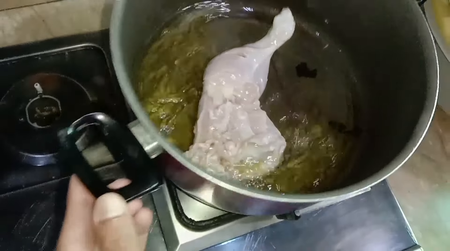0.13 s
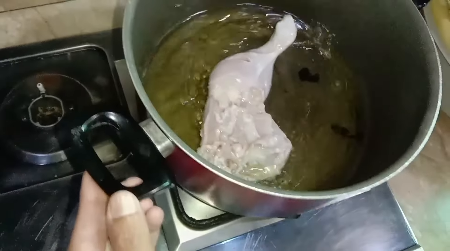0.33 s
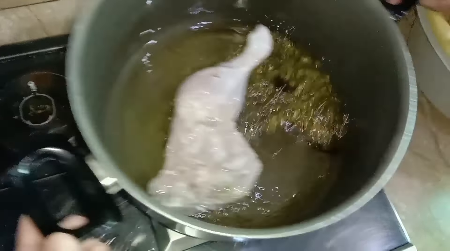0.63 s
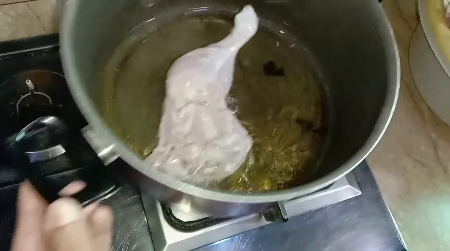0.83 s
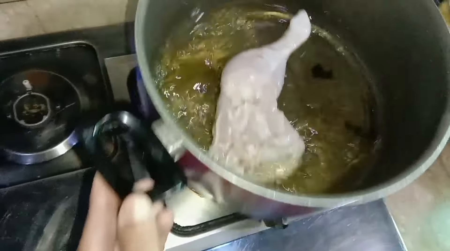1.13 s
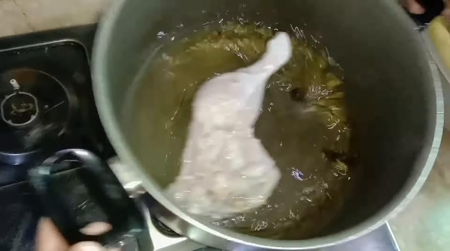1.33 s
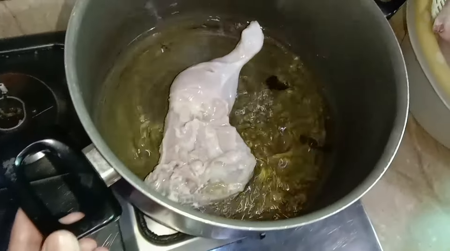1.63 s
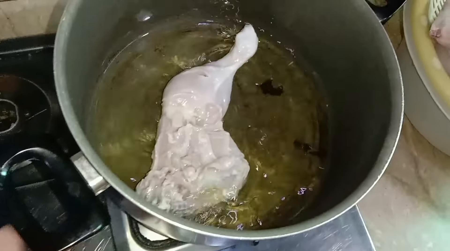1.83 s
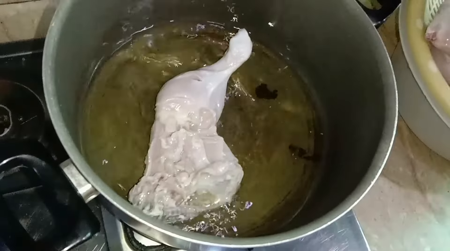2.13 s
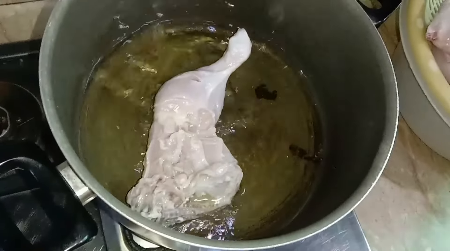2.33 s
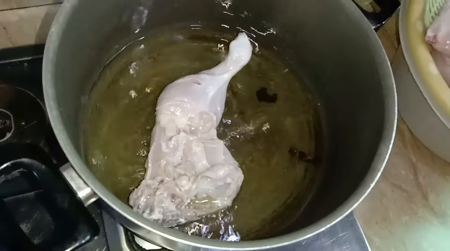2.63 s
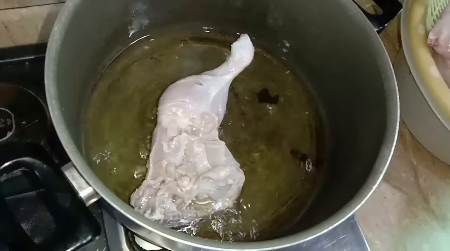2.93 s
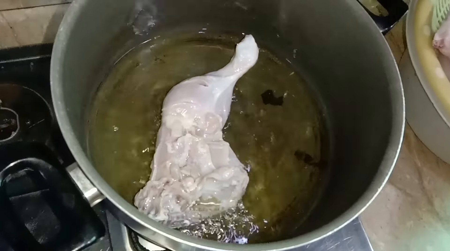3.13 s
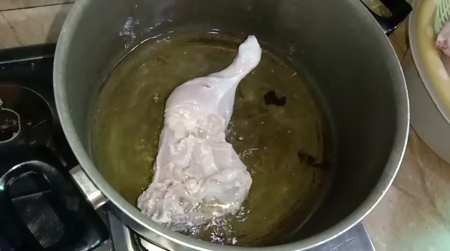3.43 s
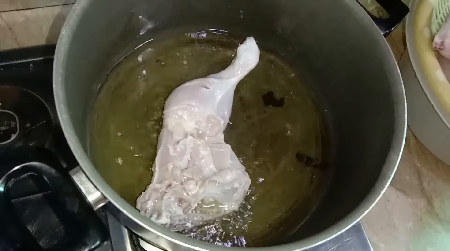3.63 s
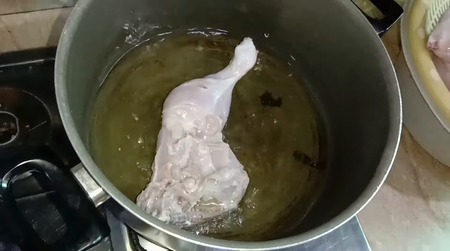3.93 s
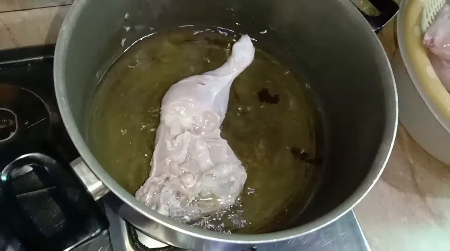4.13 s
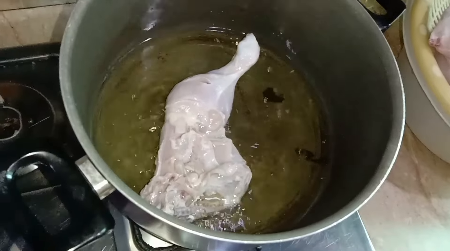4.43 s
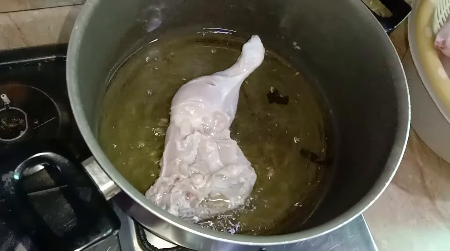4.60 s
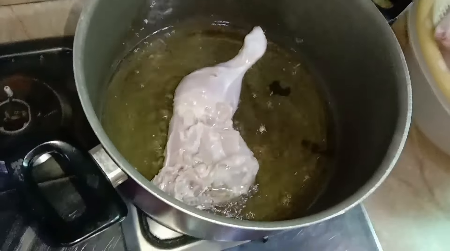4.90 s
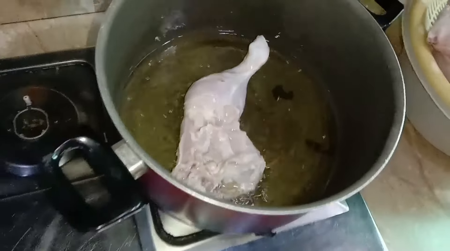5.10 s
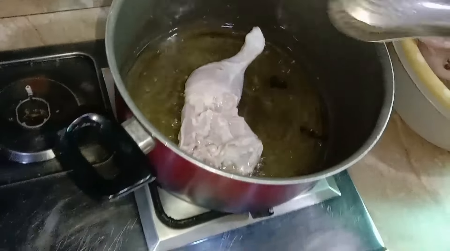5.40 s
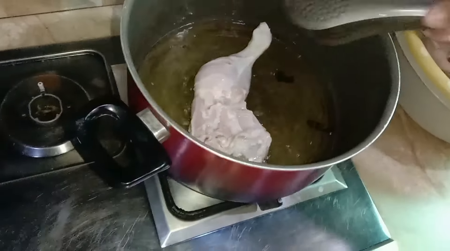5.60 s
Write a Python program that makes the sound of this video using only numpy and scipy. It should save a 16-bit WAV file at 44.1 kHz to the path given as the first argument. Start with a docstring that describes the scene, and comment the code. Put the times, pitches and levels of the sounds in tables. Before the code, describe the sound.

Oil sizzles in a deep pot as it is knocked and slid on its support, then bubbling strengthens with pops, ending in bright metal clinks.

```python
"""A chicken leg fries in a deep metal pot on a kitchen hob, heard from just above the rim.
Trains of decaying sine bubbles fizz, then boil harder; resonators and echoes stand for the pot.
Single bubbles pop, glug with a climbing pitch, and drops spit as bright bursts of noise.
The pot knocks and slides on its support as damped modes; near the end metal tongs clink."""
import sys
import numpy as np
from scipy import signal
from scipy.fft import rfft, irfft
from scipy.io import wavfile
from scipy.ndimage import uniform_filter1d

SR = 44100
rng = np.random.default_rng(int(sys.argv[2]) if len(sys.argv) > 2 else 0)


def store_wav(level_fs):
    """Save 16-bit WAV to argv[1]."""
    pcm = np.round(np.clip(np.atleast_2d(level_fs), -1, 1) * 32767)
    wavfile.write(sys.argv[1], SR, pcm.T.astype(np.int16))


N = 253969
TIME = np.arange(N) / SR
TOP_HZ = 15650  # upper limit of the microphone

# Ringing of pot and support. Each row: frequency in Hz, relative level in dB, 60 dB decay time in s.
POT_MODES = [(125, -16.5, 0.34), (192.7, -11.5, 1), (259.4, 0.5, 0.23), (435, 0, 0.12), (500.6, -9, 0.58),
             (515, -7, 0.13), (628, 1, 0.19), (770, -11, 1), (1011, 6.5, 0.13), (1066, -1, 0.2),
             (1420, -27, .2)]
# Spectrum of the fine fizz, also of hard contacts. Each row: frequency in Hz, gain in dB.
FIZZ_COLOUR = [(200, -50), (600, -18), (1400, -7.5), (2600, -2.5), (4000, -0.5), (5800, -0.5), (7300, -3.5),
               (8200, -14.5), (9200, -31), (11500, -23), (15000, -14)]
# Spectrum of a sharp snap. Each row: frequency in Hz, gain in dB.
SNAP_COLOUR = [(300, -41), (1500, -14), (4000, 9), (7500, 4.5), (9200, -9.5), (11400, -9), (12600, 2.5),
               (15000, 5)]
# The loudest bubbles. Each row: start in seconds, pitch in Hz, level in dB before the gain of pops().
POPS = [(.682, 5370, -21), (.805, 3370, -21), (1.085, 6550, -19), (1.232, 5550, -15.5), (1.454, 2300, -12),
        (1.532, 5470, -20), (1.944, 5170, -18.5), (2.016, 2570, -14.5), (2.16, 5500, -19.5),
        (2.206, 7100, -21), (2.26, 6350, -17.5), (2.306, 5630, -17), (2.441, 5160, -20), (2.514, 2670, -15),
        (2.529, 6900, -16.5), (2.568, 4400, -20), (2.656, 860, -16), (2.728, 2770, -17),
        (2.857, 6460, -16.5), (2.873, 2440, -16.5), (3.071, 1175, -7.5), (3.255, 4450, -17.5),
        (3.375, 1670, -12.5), (3.409, 1600, -9.5), (3.425, 4130, -10.5), (3.627, 2600, -13.5),
        (3.787, 4650, -13.5), (3.823, 1230, -12.5), (4.051, 1190, -9), (4.13, 1196, -13),
        (4.201, 4270, -13), (4.315, 2720, -13.5), (4.539, 2380, -9), (4.606, 3480, -13), (4.976, 3440, -12),
        (5.122, 3820, -12), (5.193, 1500, -15), (5.427, 1700, -12.5), (5.528, 3630, -12.5)]


def undb(db):
    """Decibels are logarithmic: 20 dB is a tenfold amplitude."""
    return 10 ** (np.asarray(db) / 20)


def unit(x):
    """Normalisation by effective value: scale to rms 1."""
    return x / np.sqrt(np.mean(x ** 2))


def crest(x):
    """Normalisation by crest: scale to peak 1."""
    return x / np.abs(x).max()


def steady(x):
    """Levelling: hold the running mean power at 1 while leaving the fast grain alone."""
    power = uniform_filter1d(x ** 2, size=7000)
    return x / np.sqrt(np.maximum(power, 1e-12))


def add(out, s, x):
    """Superposition: mix a sound in at time s."""
    i = min(max(int(s * SR), 0), N)
    out[i:i + len(x)] += x[:N - i]


def fade(t60, size):
    """Exponential damping: the amplitude falls by 60 dB in t60 seconds."""
    return np.exp(-np.log(1000) * TIME[:size] / t60)


def swell(s, half_s):
    """Gaussian envelope: a smooth rise and fall around time s."""
    return np.exp(-((TIME - s) / half_s) ** 2)


def walk(rate):
    """Smoothed random steps: a slow fluctuation of rms 1."""
    k = int(SR / rate)
    steps = rng.standard_normal(4096)[np.arange(N) // k]
    return unit(uniform_filter1d(uniform_filter1d(steps, k), k))


def through(x, response):
    """Linear system: convolve with its impulse response, keeping the length."""
    return signal.fftconvolve(x, response)[:len(x)]


def colour(x, points, size=4096):
    """Minimum-phase filtering: the cepstrum is folded to make the given spectrum causal."""
    hz, db = np.transpose(points)
    grid = np.maximum(np.fft.rfftfreq(size, 1 / SR), 1)
    gain_db = np.interp(np.log(grid), np.log(hz), db)
    cepstrum = irfft(np.log(undb(gain_db)))
    cepstrum[1:size // 2] *= 2
    cepstrum[size // 2 + 1:] = 0
    return through(x, irfft(np.exp(rfft(cepstrum))))


def band(x, hz, width):
    """Simple resonator: gain 1 at its centre, falling off on both sides."""
    return signal.lfilter(*signal.iirpeak(hz, hz / width, fs=SR), x)


def tail(t60, db, size=16384):
    """Reverberation: direct sound followed by dense, fading reflections."""
    response = rng.standard_normal(size) * fade(t60, size)
    response *= TIME[:size] > .0007  # gap in s before the first reflection
    response *= undb(db) / np.linalg.norm(response)
    response[0] = 1
    return response


def ring(modes, size=22050):
    """Modal vibration: a sum of damped sines, each starting at a random phase."""
    total = np.zeros(size)
    for hz, db, t60 in modes:
        total += undb(db) * fade(t60, size) * np.sin(2 * np.pi * (hz * TIME[:size] + rng.random()))
    return total


def bubble(hz, cycles, rise, size=768):
    """Bubble oscillation: damped sines, a row each, with pitch climbing by the share `rise`."""
    cycles = np.reshape(cycles, (-1, 1))
    age = np.outer(hz, TIME[:size]) / cycles
    turns = cycles * (age + rise * (age + np.expm1(-age)))
    return np.exp(-age) * np.sin(2 * np.pi * turns)


def kitchen(level_db=-49.0, unrest_db=3.0, handling_db=6, handling_s=0.89, handling_half_s=1.0):
    """Background noise: filtered noise of restless level, stronger while the pot is moved."""
    # Spectrum of the room. Each row: frequency in Hz, gain in dB.
    room_colour = [(25, -46), (50, -20), (90, -1.5), (150, 4.5), (230, -4), (350, -10.5), (700, -32),
                   (2000, -16), (8000, -17)]
    db = level_db + unrest_db * walk(rate=14) + handling_db * swell(handling_s, handling_half_s)
    return undb(db) * unit(colour(rng.standard_normal(N), room_colour))


def slide(gain_db=-1, reach=0.54, upper_db=-1.5):
    """Stick-slip friction: random slips excite the pot's modes near each push's own pitch."""
    # Pushes across the support. Each row: fastest point in seconds, half-length in seconds,
    # level in dB before gain_db, pitch in Hz.
    pushes = [(0.017, 0.12, -35.5, 550), (0.794, 0.13, -35, 248), (1.148, 0.058, -32.5, 267),
              (1.453, 0.079, -54, 200), (1.7, 0.038, -41.5, 463)]
    slips = (rng.random(N) < 900 / SR) * rng.standard_normal(N)  # 900 slips per second on average
    rubbed = [(f, unit(band(band(slips, f, 0.1 * f), f, 0.1 * f))) for f, _, _ in POT_MODES]
    wall = unit(sum(mode for f, mode in rubbed if f > 470))  # every push also rubs the higher modes
    out = np.zeros(N)
    for s, half_s, db, hz in pushes:
        body = sum(np.exp(-(np.log(f / hz) / reach) ** 2) * mode for f, mode in rubbed)
        out += undb(db + gain_db) * swell(s, half_s) * (steady(body) + undb(upper_db) * wall)
    return out


def knocks(ring_db=-23, hob_db=-19):
    """Impact: each blow gives a dull thud, rings the pot, rumbles the hob and ticks at the contact."""
    # Blows on the support. Each row: start in seconds, level in dB, pitch that the contact favours
    # in Hz, hard tick in dB relative to the body of the blow.
    blows = [(0.272, -13.5, 880, -3), (0.280, -15.5, 820, -9), (0.319, -21.5, 300, -20),
             (0.358, -24.5, 504, -21), (0.968, -17, 905, -6.5), (1.003, -19, 435, -24),
             (1.120, -19, 770, -21), (1.158, -30, 280, -20), (1.269, -24, 646, -2), (1.356, -16, 550, -5),
             (1.366, -20.5, 700, 2), (1.38, -26, 700, 9)]
    thud_colour = [(40, -13), (90, 13.5), (250, 3.0), (400, -4.5),
                   (750, 6.5), (1150, 3.0), (1550, -1.0), (4000, -6)]
    out, attack = np.zeros(N), int(.012 * SR)
    for s, db, hz, tick_db in blows:
        modes = ring(POT_MODES)
        thud, tick, rumble = rng.standard_normal((3, len(modes)))
        contact = fade(.045, len(modes))
        thud = thud * contact + undb(hob_db) * rumble * fade(0.8, len(modes))
        thud = colour(thud, thud_colour)
        body = band(thud + undb(ring_db) * modes, hz, 0.96 * hz)
        tick = colour(tick * contact, FIZZ_COLOUR)
        # levels are set over the attack
        body /= np.std(body[:attack])
        tick /= np.std(tick[:attack])
        add(out, s, undb(db) * (body + undb(tick_db) * tick))
    return out


def clinks(crack_db=-1, snap_db=-7, hum_db=-28):
    """Coupled vibration: steel tongs tap and ring on the rim; the pot answers with a low hum."""
    # Taps on the rim. Each row: start in seconds, level in dB.
    taps = [(5.667, 1), (5.741, -6)]
    # Ringing of the tongs. Each row: frequency in Hz, relative level in dB, 60 dB decay time in s.
    tong_modes = [(3542, -4.5, 0.2), (3924, 7, 0.14), (4460, -17, 0.16), (6400, 3.5, 0.028),
                  (6700, -1, 0.065)]
    out = np.zeros(N)
    for s, db in taps:
        modes = ring(tong_modes)
        contact = rng.standard_normal(len(modes))
        crack = crest(colour(contact * fade(0.032, len(modes)), FIZZ_COLOUR))
        snap = crest(colour(contact * fade(0.025, len(modes)), SNAP_COLOUR))
        hum = crest(band(ring(POT_MODES), 125, 32))
        tap = crest(crest(modes) + undb(crack_db) * crack + undb(snap_db) * snap)
        add(out, s, undb(db) * (tap + undb(hum_db) * hum))
    return out


def spits(gain_db=2.5):
    """Impulsive radiation: a water drop bursts in the oil with a sharp, bright snap."""
    # Bursting drops. Each row: start in seconds, level in dB before gain_db.
    drops = [(0.078, -12), (0.145, -9), (0.167, -11), (1.289, -15), (2.4048, -6.5), (3.201, -11),
             (3.374, -11), (4.5067, -17), (4.798, -8.5), (5.1313, -12), (5.232, -9), (5.246, -21)]
    out = np.zeros(N)
    for s, db in drops:
        snap = tail(t60=0.035, db=9, size=4096)
        add(out, s, undb(db + gain_db) * crest(colour(snap, SNAP_COLOUR)))
    return out


def glugs(wash_db=-17):
    """Shrinking cavity: a steam pocket climbs in pitch as it surfaces; oil washes into the hollow."""
    # Large pockets of steam. Each row: start in seconds, pitch in Hz, level in dB,
    # decay in cycles of ringing, pitch rise as a share.
    pockets = [(0.026, 560, -20.5, 11, .03), (0.18, 504, -22.5, 15, 0.026), (0.574, 488, -27, 9.2, 0.023),
               (4.696, 250, -3.5, 0.77, 0.59)]
    body_colour = [(30, -40), (90, -9.5), (230, 12), (750, 10), (2000, -12)]
    out = np.zeros(N)
    for s, hz, db, cycles, rise in pockets:
        plop = bubble([hz], cycles, rise, size=12000)[0]
        # a sudden collapse also sets off a smaller, higher bubble
        plop += 2.0 * rise * bubble([1.8 * hz], 2 * cycles, rise, size=12000)[0]
        wash = unit(band(rng.standard_normal(len(plop)), hz, hz)) * fade(0.29, len(plop))
        body = colour(crest(plop) + undb(wash_db) * wash, body_colour)
        add(out, s, undb(db) * crest(body))
    return out


def vigour():
    """Drive level: strength of the boil in dB, 0 when it is rolling."""
    # How hard the oil boils. Each row: time in seconds, level in dB.
    boiling = [(0.0, -31), (0.51, -38), (0.77, -31), (1.51, -31.5), (1.78, -35.5), (2.52, -32), (2.89, -26),
               (3.27, -27), (3.56, -25), (4.6, -22.5), (5.47, -22.5), (5.76, -26.5)]
    times, levels = np.transpose(boiling)
    return np.interp(TIME, times, levels) + 23  # a rolling boil stands at -23 dB


def stray_bubbles(count=68, level_db=-19, centre_hz=2970, spread_octaves=0.99):
    """Size sets pitch: lesser bubbles, deeper, louder and more varied as the boil grows."""
    slope, fall_oct_per_db, widen_oct_per_db, scatter_db = 0.43, .07, .045, 3.5
    when, pitch, strength = rng.random((count, 3)).T
    at = ((np.arange(count) + when) * N / count).astype(int)
    drive = vigour()[at]
    octaves = (spread_octaves + widen_oct_per_db * drive) * (2 * pitch - 1) - fall_oct_per_db * drive
    db = level_db + slope * drive + scatter_db * (2 * strength - 1)
    hz = np.minimum(centre_hz * 2 ** octaves, TOP_HZ / 2)
    return np.column_stack([at / SR, hz, db])  # same columns as POPS


def pops(bubbles, gain_db=0.5, cycles=2.9, scatter=0.056, skin_db=-14, break_s=.011):
    """Fragmentation: a bubble breaks into smaller ones near its pitch, with a rasp as its skin tears."""
    pop_colour = [(150, -10), (380, -20), (600, -5), (7300, -2),
                  (8200, -15), (9300, -23), (12000, -22), (15000, -29)]
    out, length = np.zeros(N), 4096
    for s, hz, db in bubbles:
        burst = np.zeros(length)
        when, detune, sign = rng.random((3, 9))  # nine fragments
        span = break_s * 2 ** (rng.random() - .5)  # break-up time varies by half an octave either way
        lags = (np.arange(len(when)) + when - when[0]) / len(when)
        grains = bubble(hz * 2 ** (scatter * (2 * detune - 1)), cycles, rise=0.029)
        grains *= np.sign(sign - .5)[:, None]
        for lag, grain in zip(lags, grains):
            i = int(lag * span * SR)
            burst[i:i + len(grain)] += (1 - .65 * lag) * grain
        burst += undb(skin_db) * rng.standard_normal(length) * fade(4 * span, length)
        burst = band(band(burst, hz, 1.3 * hz), hz, 1.3 * hz)
        burst = through(burst, tail(t60=.055, db=-6))
        add(out, s, undb(db + gain_db) * burst / np.std(burst[:int(span * SR)]))
    return colour(out, pop_colour)


def swarm(low_hz, high_hz, cycles, spread_db, count, size, spurt_s=.016):
    """Random superposition: spurts of steam, each a quick train of `size` bubbles near one pitch."""
    when, pitch, strength = rng.random((3, count, 1))
    lag, detune, life = rng.random((3, count, size))
    spurt_at = (np.arange(count)[:, None] + 2 * when) * N / count
    starts = (spurt_at + spurt_s * SR * lag ** 2).astype(int).ravel()
    hz = ((low_hz + (high_hz - low_hz) * pitch) * 2 ** (.5 * (detune - .5))).ravel()
    # every spurt has its own strength; later bubbles in it are weaker
    sizes = undb(spread_db * np.minimum(-np.log(1 - strength), 2.5)) * (1 - .5 * lag)
    grains = bubble(hz, cycles * (.5 + life.ravel()), rise=0.051, size=512)
    grains *= (sizes.ravel() * np.sqrt(hz))[:, None]
    places = starts[:, None] + np.arange(grains.shape[1])
    return np.bincount(places.ravel(), grains.ravel(), N)[:N]


def in_pot(x, ring_db):
    """Cavity resonance: sound bounces between oil and wall and rings the pot's resonances."""
    # Resonances of air and wall. Each row: frequency in Hz, width in Hz, relative level in dB.
    cavity = [(725, 44, 5.5), (1069, 99, 7), (1631, 110, 12.5), (2166, 136, 7.5), (2680, 215, 8.5),
              (3530, 150, 5), (3945, 26, 17), (4405, 124, 14.5), (5820, 140, 12)]
    resonance = sum(undb(db) * band(x, hz, width) for hz, width, db in cavity)
    return through(x + undb(ring_db) * resonance, tail(t60=.045, db=-5))


def film_bursts():
    """Shot noise: every film snaps at once and its hiss dies away between the walls."""
    strength = undb(5 * np.minimum(rng.exponential(size=N), 4))
    bursts = (rng.random(N) < 500 / SR) * strength  # 500 films per second on average
    decay = fade(.003, size=4096) ** 2 + undb(-11) * fade(.07, size=4096) ** 2
    power = through(bursts ** 2, decay)
    return np.sqrt(np.abs(power)) * rng.standard_normal(N)


def frying(flutter_db=0.76, count=4):
    """Layered boiling: fizz, boil and large bubbles rise at several spots; tiny films burst on top."""
    # Spectra of the layers. Each row: frequency in Hz, gain in dB.
    boil_colour = [(150, -33), (400, -31), (750, -11), (1050, -2), (1350, 0.5), (1650, -6.5), (3000, -4),
                   (4400, -5), (5200, -6), (8000, -48)]
    large_colour = [(100, -17), (340, -56.5), (480, 1), (850, 4), (1400, -21)]
    prickle_colour = [(300, -40), (1500, -1), (4000, 9), (7500, 10.5), (9200, -9.5), (11400, -12),
                      (12600, 0), (15000, 0.5)]
    # Swirled oil washing over the wet skin. Each row: crest in seconds, strength from 0 to 1.
    washes = [(.13, 0.5), (.69, 0.92), (1.02, 0.46), (1.3, 0.2), (1.52, 0.92), (1.8, 0.03)]
    # Clusters of large slow bubbles. Each row: middle in seconds, gain in dB.
    gurgles = [(1.53, 13), (2.65, 22), (4.04, 14), (4.58, 13.5), (4.8, 13.5)]
    fizz, boil, large = np.zeros((3, N))
    for _ in range(count):
        fizz += in_pot(swarm(1700, 8500, cycles=2.8, spread_db=3.3, count=540, size=7), ring_db=-10)
        boil += in_pot(swarm(700, 4600, cycles=3.6, spread_db=3.5, count=600, size=4), ring_db=-2)
        large += in_pot(swarm(480, 850, cycles=1.4, spread_db=3, count=100, size=3), ring_db=-4)
    drive = vigour()
    wash = sum(strength * swell(s, half_s=0.098) for s, strength in washes)
    simmer = 4.4 * swell(3.55, half_s=0.7)  # dB added to the fizz while the boil builds
    gurgle = sum(db * swell(s, half_s=0.095) for s, db in gurgles)
    # level at a rolling boil in dB, plus the dB gained per dB of boiling
    fizz_db = -24.5 + 0.33 * drive + simmer
    boil_db = -19 + 1.576 * drive
    large_db = -43 + 1.01 * drive + gurgle
    prickle_db = -33 - 0.3 * drive + 9 * wash  # a full wash adds 9 dB
    layers = undb(fizz_db) * steady(colour(fizz, FIZZ_COLOUR))
    layers += undb(boil_db) * steady(colour(boil, boil_colour))
    layers += undb(large_db) * steady(colour(large, large_colour))
    layers += undb(prickle_db) * steady(colour(film_bursts(), prickle_colour))
    return undb(flutter_db * walk(rate=39)) * layers


def lulls(hush_s=0.02, hush_db=-0.5):
    """Amplitude modulation: the sizzle sinks in short lulls and just before each of the loudest bubbles."""
    # Short lulls. Each row: start in seconds, end in seconds, gain in dB.
    pauses = [(1.307, 1.349, -4), (3.182, 3.201, -10.5), (5.637, 5.674, -10)]
    dips = list(pauses) + [(s - hush_s, s, hush_db) for s, _, _ in POPS]
    db = sum(depth * ((TIME > start) & (TIME < end)) for start, end, depth in dips)
    return undb(uniform_filter1d(db, size=200))


def scene():
    """Superposition: everything at the hob, with a little reverberation from the tiled walls."""
    sizzle = lulls() * (frying() + pops(stray_bubbles()))
    hob = sizzle + pops(POPS) + glugs() + spits() + knocks() + slide() + clinks()
    walls = tail(t60=.3, db=-13)
    return (through(hob, walls) + kitchen())[None]


def record(dry):
    """Saturation and band limit: the microphone rounds the highest peaks and cuts the top."""
    rounded = np.tanh(0.69 * dry) / 0.73
    low_pass = signal.ellip(10, .2, 80, TOP_HZ, fs=SR, output="sos")
    return signal.sosfilt(low_pass, rounded)


dry = scene()
out = record(dry)
store_wav(out)
```